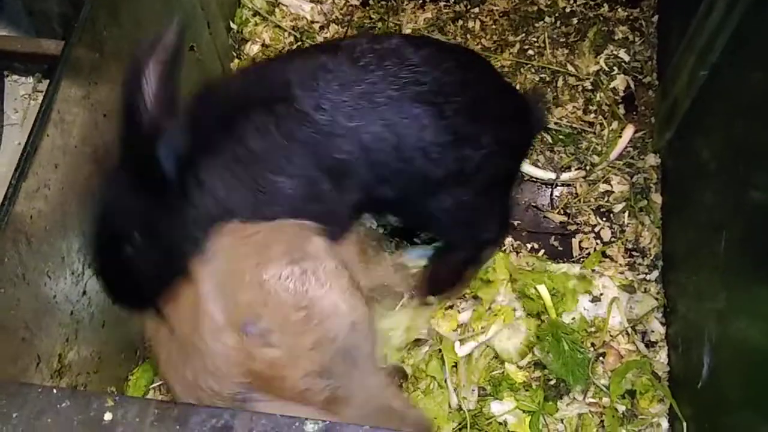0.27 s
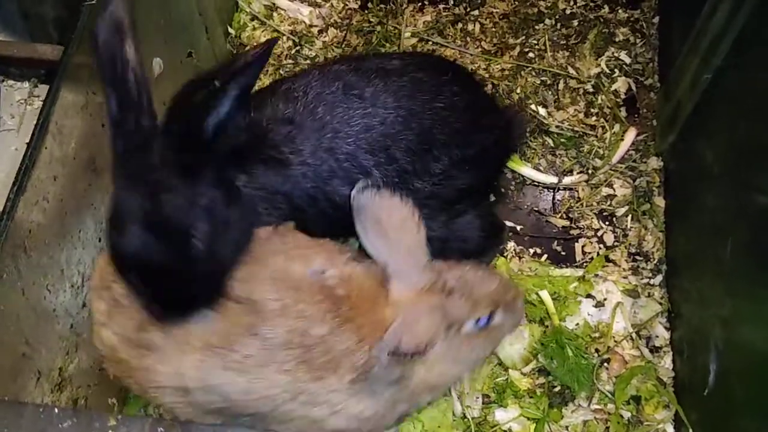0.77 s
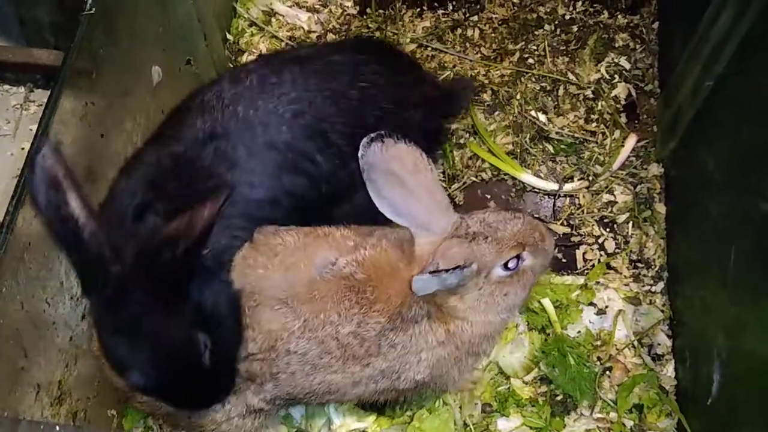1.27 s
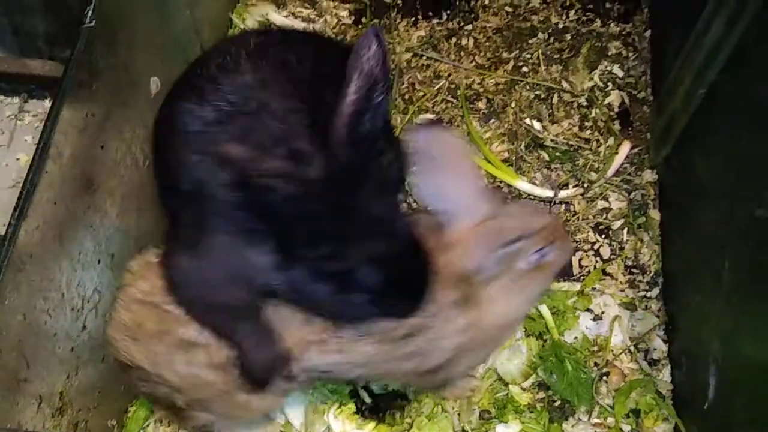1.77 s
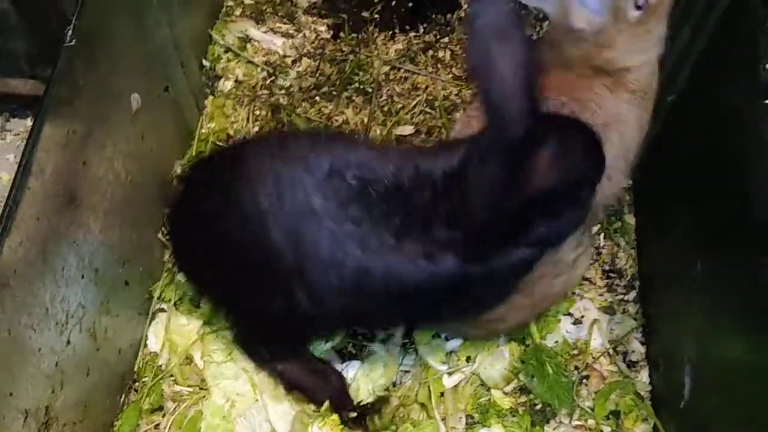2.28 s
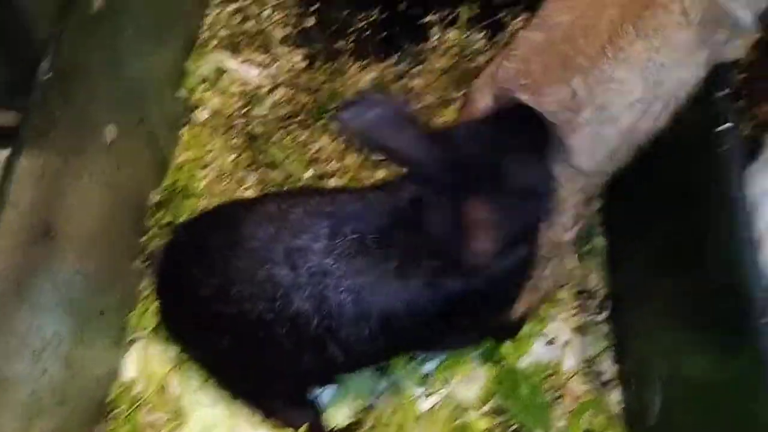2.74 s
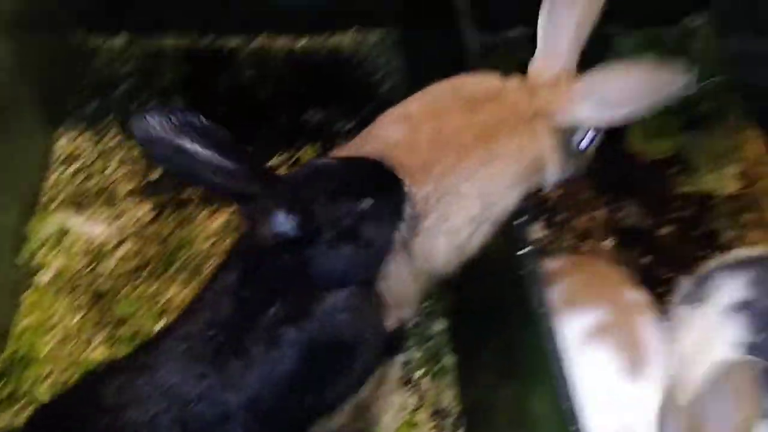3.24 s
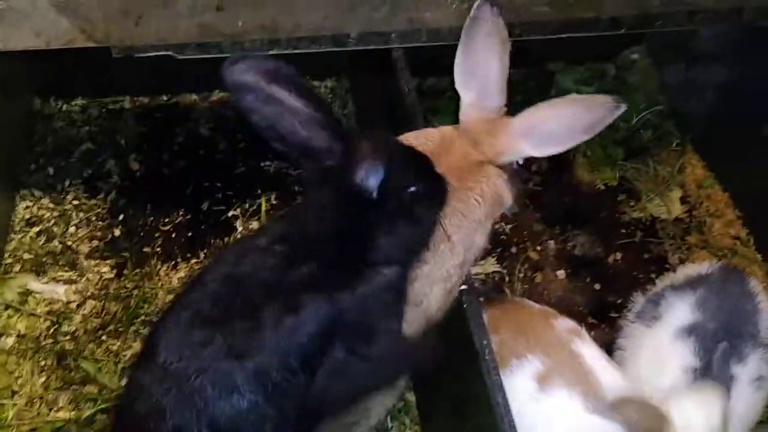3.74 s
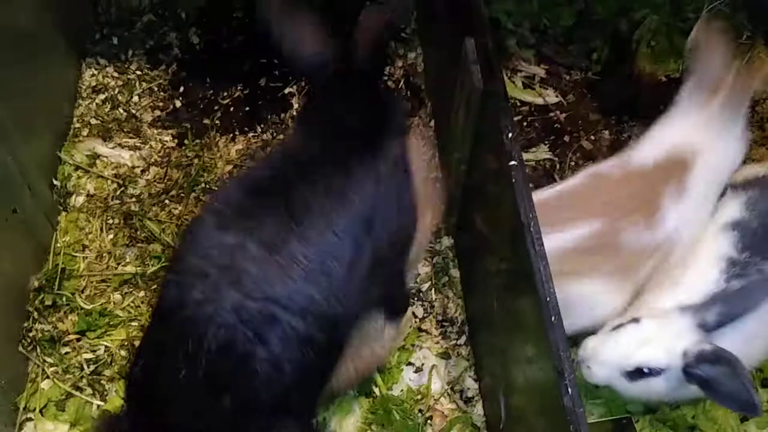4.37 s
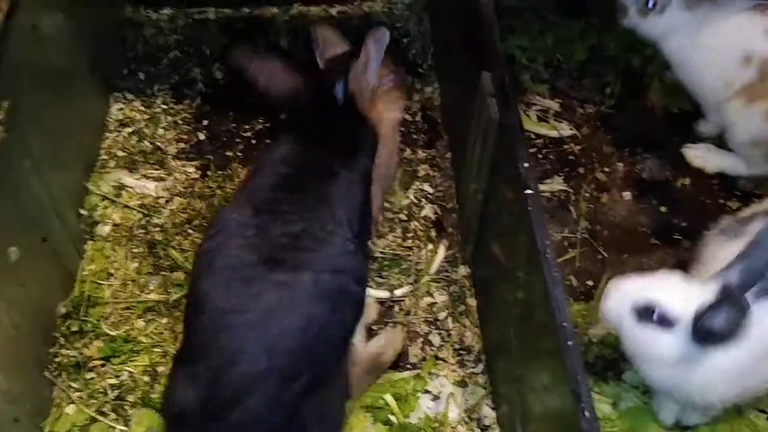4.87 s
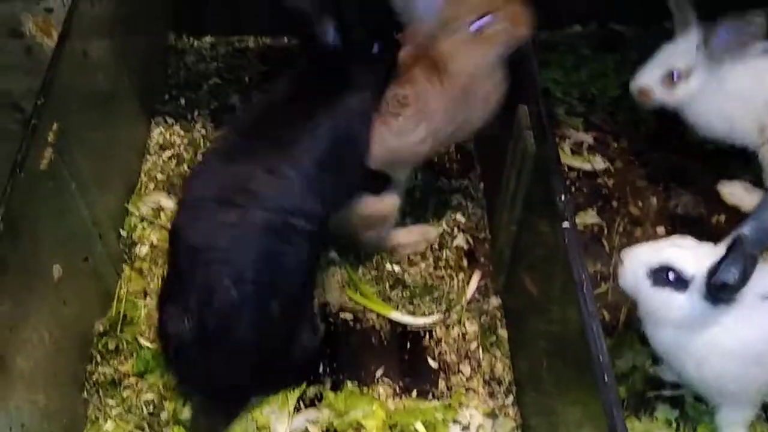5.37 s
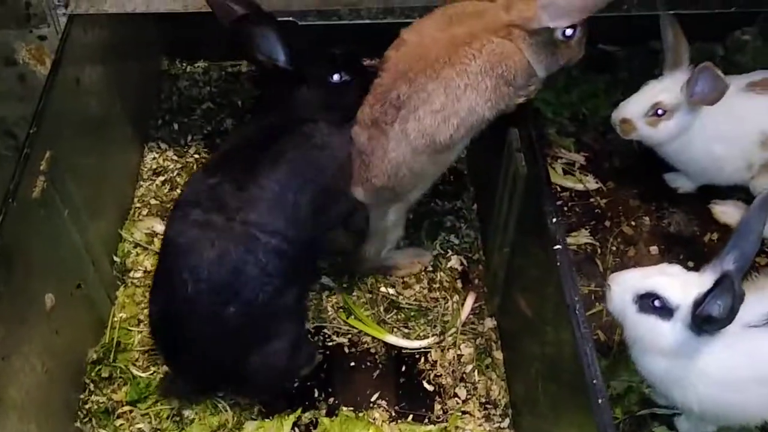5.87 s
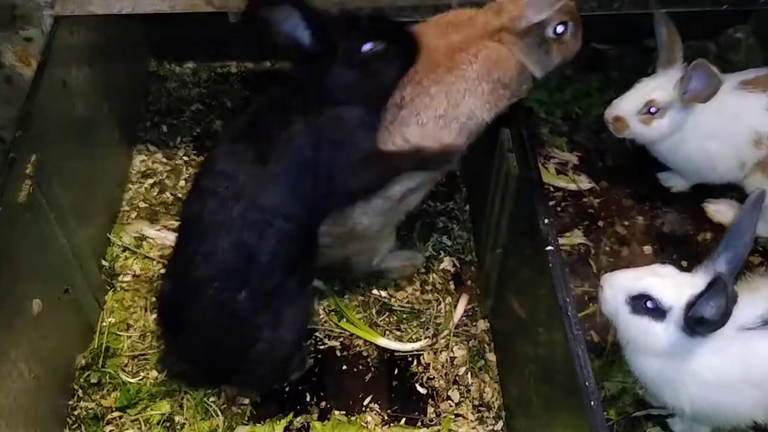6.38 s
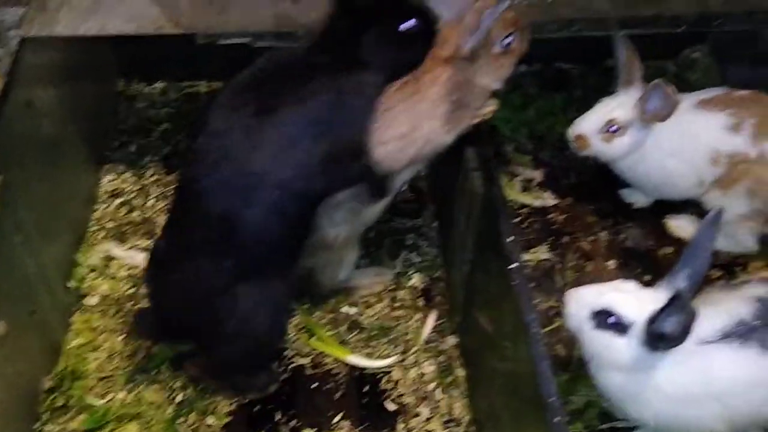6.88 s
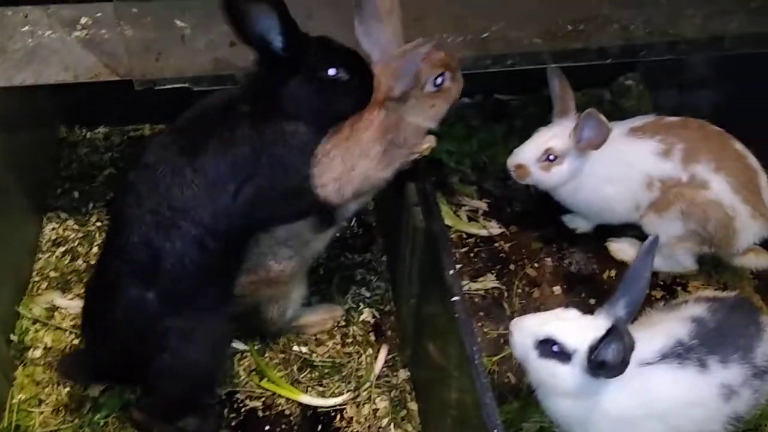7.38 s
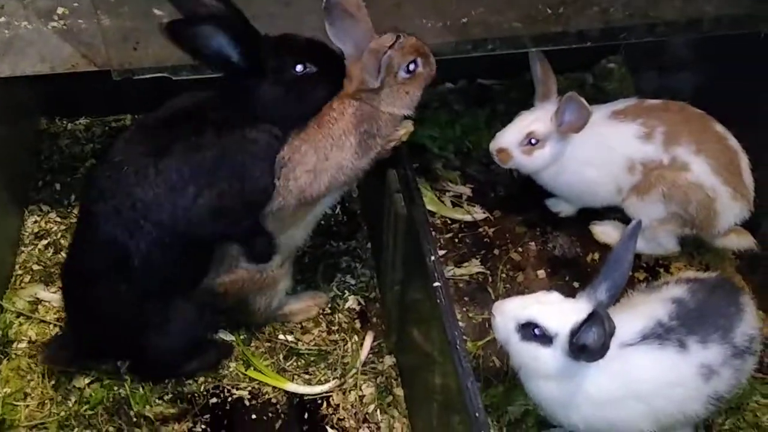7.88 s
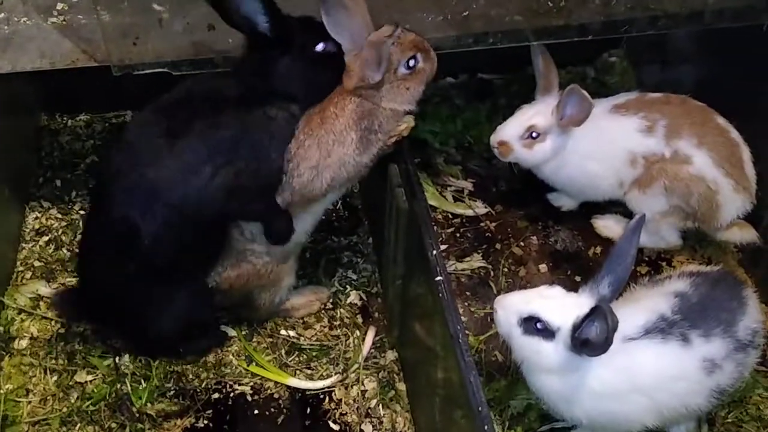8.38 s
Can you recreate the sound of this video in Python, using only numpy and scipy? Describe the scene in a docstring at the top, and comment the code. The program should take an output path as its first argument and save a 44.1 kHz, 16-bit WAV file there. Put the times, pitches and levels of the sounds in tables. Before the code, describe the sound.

Soft booming thumps, crisp bedding rustle and sudden claw scratches as two rabbits chase inside a wooden box, with a distant low rumble passing.

```python
"""Inside a wooden hutch, heard in stereo from just above: two rabbits chase and mount each other.
Feet boom on the hollow floor and knock the boards (ringing modes); claws rip the wood (noise bursts).
Shavings and leaves rustle and snap (grains and short cracks), with a brief echo from the walls.
Outdoors, filtered noise makes a hiss and a low rumble that swells once, like a far vehicle going by;
thin gliding calls, perhaps of a far bird, are faint."""
import sys
import numpy as np
from scipy import signal
from scipy.fft import rfft, irfft, next_fast_len
from scipy.io import wavfile

SR = 44100
rng = np.random.default_rng(int(sys.argv[2]) if len(sys.argv) > 2 else 0)


def file_out(sig):
    """Save sig as 16-bit WAV at sys.argv[1]."""
    # one column per channel
    cols = np.atleast_2d(sig).T
    # limit, then scale
    lim = np.clip(cols, -1, 1)
    pcm = np.round(lim * 32767).astype(np.int16)
    wavfile.write(sys.argv[1], SR, pcm)


N = 380141  # length [samples]
TIME = np.arange(N) / SR
RING_TIME = TIME[:SR // 2]  # each contact is given half a second


def from_db(db):
    """Turns a level in dB into an amplitude factor."""
    return 10 ** (np.asarray(db) / 20)


def rms_one(x):
    """Scales a signal to an rms of 1."""
    return x / np.sqrt(np.mean(x ** 2) + 1e-20)


def at_hz(points, hz):
    """Reads a spectrum on a log-frequency axis."""
    points = np.array(points)
    log_hz = np.log(np.maximum(hz, 1))
    return np.interp(log_hz, np.log(points[:, 0]), points[:, 1])


def panned(x, pan_db):
    """Shares a sound between the channels; positive is louder on the left."""
    return x * from_db([[pan_db / 2], [-pan_db / 2]])


def add(out, s, sound):
    """Mixes a sound in at time s."""
    start = max(0, round(s * SR))
    out[:, start:start + sound.shape[1]] += sound[:, :N - start]


def colour(x, spectrum):
    """Gives a signal a spectrum by weighting its frequencies; rms 1."""
    size = next_fast_len(x.shape[-1], True)
    gain = from_db(at_hz(spectrum, np.fft.rfftfreq(size, 1 / SR)))
    shaped = irfft(rfft(x, size) * gain, size)
    return rms_one(shaped[..., :x.shape[-1]])


def swell(rise_s, t60):
    """A ring that builds up and dies away, falling 60 dB in t60 seconds."""
    return (1 - np.exp(-RING_TIME / rise_s)) * from_db(-60 * RING_TIME / t60)


def plateau(s, hold_s, rise_db_per_s, fall_db_per_s):
    """Attack, hold and release in dB: full level (0 dB) from time s on, for hold_s."""
    rise_db = -rise_db_per_s * np.maximum(s - TIME, 0)
    fall_db = -fall_db_per_s * np.maximum(TIME - s - hold_s, 0)
    return rise_db + fall_db


def flutter(per_s, depth_db, size):
    """An uneven gain, gliding between random steps of at most twice the depth."""
    steps = rng.standard_normal(int(size / SR * per_s) + 2)
    steps = np.clip(steps, -2, 2)
    return from_db(depth_db * np.interp(TIME[:size] * per_s, np.arange(len(steps)), steps))


# likeness of the left and right microphone signals: (frequency [Hz], correlation [-1 to 1])
LIKENESS = [(100, 0.96), (400, 0.91), (700, 0.19), (1050, 0), (2000, 0.066), (15000, 0.0026)]


def noise(spectrum, size):
    """Diffuse stereo noise, much alike in both channels only in the bass."""
    padded = next_fast_len(size)
    alike = np.clip(at_hz(LIKENESS, np.fft.rfftfreq(padded, 1 / SR)), -1, 1)
    mid, side = rfft(rng.standard_normal((2, padded)))
    pair = np.sqrt(1 + alike) * mid + np.sqrt(1 - alike) * side * [[1], [-1]]
    return colour(irfft(pair, padded), spectrum)[:, :size]


def struck(modes, strength, rise_cycles):
    """One blow rings every mode with a random phase; high modes reach the channels out of step."""
    out = 0
    for hz, db, t60 in modes:
        apart = np.arccos(np.clip(at_hz(LIKENESS, hz), -1, 1)) * rng.choice([-.5, .5])
        phase = rng.uniform(0, 2 * np.pi) + apart * np.array([[1], [-1]])
        ring = swell(rise_cycles / hz, t60) * np.sin(2 * np.pi * hz * RING_TIME + phase)
        out = out + from_db(db + at_hz(strength, hz)) * ring
    return out


# hollow resonances of the wooden box: (frequency [Hz], width [Hz], added resonance [dB])
BOX = [(520.7, 55, 3), (604, 36, 4), (725, 110, 7), (943, 30, 5), (1006, 32, 6.5), (1236, 45, 3),
       (1530, 71, -1), (1957, 32, 1), (2250, 140, 3), (2480, 17, -3.5), (3640, 48, 6.5)]


def boxed(x):
    """The box lifts whatever lies near its hollow resonances."""
    out = x
    for hz, width_hz, db in BOX:
        out = out + from_db(db) * signal.lfilter(*signal.iirpeak(hz, hz / width_hz, fs=SR), x)
    return out


HUTCH_T60_S = .2


def hutch(x, echo_db):
    """Close wooden walls add a dense, short tail."""
    tail = rng.standard_normal((2, len(RING_TIME))) * swell(0.001, HUTCH_T60_S)
    tail = tail / np.sqrt(np.sum(tail ** 2, axis=1, keepdims=True))
    return x + from_db(echo_db) * signal.fftconvolve(x, tail, axes=1)[:, :N]


# spectra of the low rumble, the far road and the faint hiss: (frequency [Hz], relative density [dB])
RUMBLE = [(15, -12.5), (30, -5.5), (42, -0.5), (60, -3.5), (85, -6), (115, -1.5), (145, -5), (175, -9.5),
          (215, -10.5), (280, -27.5), (400, -36), (900, -58)]
ROAD = [(40, 7.5), (150, 16.5), (300, 12), (400, 2), (520, -1.5), (700, -12), (900, -17.5), (1200, -10.5),
        (1700, -13.5), (2600, -20), (5000, -33)]
HISS = [(200, 6), (1000, 4.5), (3000, 1), (7000, 0), (11000, 1.5), (15500, -7.5)]
HISS_DB = -84.5
# one slow swell, as of a far vehicle: it nears, stays a moment and recedes
PASS_S, PASS_HOLD_S = 4.82, .6
RUMBLE_REST_DB, RUMBLE_PASS_DB = -66.5, -52.5
ROAD_REST_DB, ROAD_PASS_DB = -90.5, -57.5


def outdoors():
    """A low rumble and far road noise swell and recede as noise; the box colours the road, a hiss stays."""
    rumble_db = RUMBLE_PASS_DB + plateau(PASS_S, PASS_HOLD_S, rise_db_per_s=14.5, fall_db_per_s=4.0)
    road_db = ROAD_PASS_DB + plateau(PASS_S, PASS_HOLD_S, rise_db_per_s=28, fall_db_per_s=10.5)
    # the steady and the passing part add as powers
    rumble_level = np.hypot(from_db(RUMBLE_REST_DB), from_db(rumble_db))
    road_level = np.hypot(from_db(ROAD_REST_DB), from_db(road_db))
    rumble = rumble_level * noise(RUMBLE, N) * flutter(per_s=19, depth_db=1.5, size=N)
    road = road_level * boxed(noise(ROAD, N)) * flutter(per_s=48, depth_db=3.0, size=N)
    return panned(rumble + road, 1.0) + from_db(HISS_DB) * noise(HISS, N)


# thin, faint gliding calls, perhaps of a far bird:
# (time [s], length [s], start pitch [Hz], end pitch [Hz], level [dB])
FAR_CALLS = [(0.106, 0.29, 1196, 1270, -81.5), (1.716, 0.35, 1116, 1280, -90),
             (3.486, 0.25, 1110, 1212, -89.5), (3.658, 0.1, 1434, 1600, -86),
             (6.236, 0.27, 1543, 1510, -81.5), (6.84, 0.055, 1234, 1245, -79.5),
             (6.89, 0.087, 1500, 1510, -86), (7.418, 0.065, 1504, 1590, -87)]


def far_bird():
    """Thin gliding calls, smeared by distance into a wavering band."""
    out = np.zeros((2, N))
    for s, length_s, start_hz, end_hz, db in FAR_CALLS:
        size = int(length_s * SR)
        phase = 2 * np.pi * np.cumsum(np.linspace(start_hz, end_hz, size)) / SR
        # slow noise in both quadratures spreads the pitch into a band
        waver = colour(rng.standard_normal((2, 2, size)), [(35, 0), (90, -7), (250, -28), (700, -80)])
        call = waver[0] * np.cos(phase) + waver[1] * np.sin(phase)
        add(out, s, from_db(db) * call * signal.windows.tukey(size, .5))
    return out


def grains(per_s, spread_db):
    """Countless tiny breaks of uneven size, each with its own strength in either channel."""
    born = rng.random(N) < per_s / SR
    sizes = from_db(spread_db * np.minimum(rng.exponential(1, N), 4))
    return born * sizes * rng.standard_normal((2, N))


def shifting(x, per_s, depth_db):
    """As strokes bend other stalks, the octaves of a rustle swell and fade on their own."""
    out, rest = 0, x
    for hz in 700 * 2 ** np.arange(5):
        below = signal.sosfiltfilt(signal.butter(2, hz, fs=SR, output="sos"), rest)
        out = out + below * flutter(per_s, depth_db, N)
        rest = rest - below
    return rms_one(out + rest * flutter(per_s, depth_db, N))


# a foot or flank sweeps through the bedding:
# (time [s], length [s], crisp shavings level [dB], dragging level [dB])
STROKES = [(0.035, 0.078, -70, -89), (0.256, 0.072, -64, -74.5), (0.33, 0.078, -54.5, -69.5),
           (0.421, 0.11, -57.5, -64), (0.57, 0.024, -66, -77), (0.773, 0.0081, -75.5, -99),
           (0.877, 0.0051, -81, -84.5), (1.295, 0.064, -81.5, -89.5), (1.432, .015, -75, -94),
           (1.535, 0.041, -67, -86), (1.727, 0.0084, -79, -102), (2.057, 0.034, -64.5, -74.5),
           (2.219, 0.2, -63, -74), (2.356, 0.079, -61.5, -71.5), (3.025, 0.015, -75, -76.5),
           (3.09, 0.089, -70, -84.5), (3.289, 0.005, -60, -68.5), (3.42, .02, -80.5, -103),
           (3.857, 0.053, -55, -68.5), (3.92, 0.01, -60, -59.5), (4.02, 0.06, -71.5, -82),
           (4.2, 0.023, -60, -68.5), (4.312, 0.0069, -54.5, -58.5), (4.394, 0.051, -59, -64),
           (4.535, 0.013, -62.5, -62.5), (4.863, 0.039, -60, -67), (5.047, 0.012, -55, -62),
           (5.129, 0.036, -53.5, -62), (5.207, 0.025, -59, -62.5), (5.297, 0.035, -62, -64.5),
           (5.423, 0.032, -61, -69.5), (5.52, 0.12, -68.5, -80), (5.789, 0.0053, -60.5, -69.5),
           (7.66, 0.012, -68, -83), (7.705, 0.0087, -69.5, -82.5), (8.414, 0.043, -66, -71),
           (8.575, 0.011, -77.5, -104)]
# every stroke bites quickly, then the shavings settle
BITE_DB_PER_S, SETTLE_DB_PER_S = 750, 173


def stroke_levels():
    """Gains of the crisp and the dragging rustle; the strongest stroke of the moment leads."""
    crisp = drag = -np.inf
    for s, length_s, crisp_db, drag_db in STROKES:
        shape_db = plateau(s, length_s, BITE_DB_PER_S, SETTLE_DB_PER_S)
        crisp = np.maximum(crisp, crisp_db + shape_db)
        drag = np.maximum(drag, drag_db + shape_db)
    return from_db(crisp), from_db(drag)


# spectra of crackling shavings and of dragging fur and feet: (frequency [Hz], relative density [dB])
CRISP = [(1500, -30), (3500, -10.5), (5500, -5.5), (8000, 3), (11000, 5), (13500, 3.5), (15500, -3.5)]
DRAG = [(200, -0.5), (450, -4), (750, -2.5), (1500, 3.5), (2400, 3), (4000, -3.5), (6500, -5.5),
        (12000, -22)]
STIR_DB = 14.5  # the floor's murmur under a dragging body, relative to the drag


def bedding():
    """Shavings crackle as grains under the bodies; fur and feet drag more dully and stir the floor."""
    crisp_level, drag_level = stroke_levels()
    catching = flutter(per_s=55, depth_db=2.4, size=N)  # a foot catches and slips
    fine = colour(catching * grains(per_s=3000, spread_db=3.3), CRISP)
    coarse = colour(catching * grains(per_s=600, spread_db=3.0), DRAG)
    crisp = crisp_level * shifting(fine, per_s=60, depth_db=3)
    drag = drag_level * boxed(shifting(coarse, per_s=45, depth_db=4))
    murmur = noise([(70, -12), (140, -1.5), (180, -8), (220, 1), (300, -17), (600, -32.5)], N)
    stir = from_db(STIR_DB) * drag_level * murmur
    return hutch(panned(crisp, 0.79) + panned(drag, -0.66), echo_db=-4.5) + stir


# single stalks snapping: (time [s], level before decay and echo [dB], left minus right [dB])
SNAPS = [(0.2573, -64, 12), (0.3095, -51, 0), (0.4968, -41.5, 4), (0.5346, -59, -9), (0.8777, -57, 8),
         (1.2392, -61, -11), (2.0735, -32.5, 5.5), (2.1365, -39, 5), (2.2958, -40.5, -3),
         (3.8794, -33, -0.5), (4.1999, -44, 3), (4.2217, -43.5, -3), (4.3195, -24.5, 2.5),
         (4.433, -43.5, -3), (4.538, -44, 5), (5.012, -48.5, 6), (5.208, -38, 3), (5.3352, -37, 1),
         (5.4211, -43, 2), (5.771, -52, 6), (6.9565, -23, 5.5)]
# spectrum of a crack before the stalk's own pitch: (frequency [Hz], relative density [dB])
SNAP_SPECTRUM = [(500, -21), (2000, -5), (4000, -0.5), (7000, 3), (11000, 1), (15500, 3)]


def snaps():
    """Dry stalks break with a crack of a few milliseconds, each with its own pitch."""
    out = np.zeros((2, N))
    for s, level_db, pan_db in SNAPS:
        crack = noise(SNAP_SPECTRUM, len(RING_TIME))
        stalk = signal.lfilter(*signal.iirpeak(rng.uniform(4000, 13000), 3, fs=SR), crack)
        snap = rms_one(crack + 2 * stalk) * swell(.00005, .01)
        add(out, s, from_db(level_db) * panned(snap, pan_db))
    return hutch(out, echo_db=-2.5)


# quick claw scratches:
# (time [s], panel ring level [dB], rasp level [dB], hiss level [dB], left minus right of the hiss [dB])
SCRATCHES = [(2.3624, -84, -52, -40.5, 3), (4.3185, -63, -52, -63, 10), (5.3282, -63, -58, -41, 4),
             (6.958, -56, -31.5, -28, 11), (7.6565, -93, -71, -64, 8), (8.407, -92.5, -62, -48, 7)]
# spectra of the scratch and of the panel's lingering ring: (frequency [Hz], relative density [dB])
SCRATCH_SPECTRUM = [(300, -13), (750, -27), (1150, -12.5), (1500, -5.5), (2100, 4), (3000, -1), (4500, -4),
                    (6500, -4), (10500, -1.5), (13000, -4), (15500, -13.5)]
PANEL = [(700, -42.5), (1000, -15.5), (1110, -1), (1200, -4), (1330, -23), (1780, -36.5), (1900, -3.5),
         (2020, -37), (4000, -65.5)]


def scratches():
    """A claw rips across the wood: a sudden, uneven rasp and hiss; the panel rings on a little."""
    out, size = np.zeros((2, N)), len(RING_TIME)
    rasp_filter = signal.butter(2, 5000, fs=SR, output="sos")
    hiss_filter = signal.butter(2, 5500, "high", fs=SR, output="sos")
    for s, panel_db, rasp_db, hiss_db, pan_db in SCRATCHES:
        grit = noise(SCRATCH_SPECTRUM, size)
        direct = grit * flutter(per_s=900, depth_db=3, size=size) * swell(.002, .155)
        echo = from_db(-15.0) * grit * swell(0.0061, 0.37)
        rasp = signal.sosfilt(rasp_filter, boxed(direct + echo))
        # only the direct hiss comes from one side; its echo fills the box
        hiss = signal.sosfilt(hiss_filter, panned(direct, pan_db) + echo)
        add(out, s, from_db(rasp_db) * rasp - from_db(hiss_db) * hiss)
        add(out, s, from_db(panel_db) * noise(PANEL, size) * swell(0.0031, 0.74))
    return out


# claws and bodies against the boards:
# (time [s], clatter level [dB], low modes level [dB], middle modes level [dB], high modes level [dB])
KNOCKS = [(0.403, -47, -29, -33.5, -53), (0.882, -79, -66, -96, -67.5), (1.576, -72, -64, -76, -75),
          (2.194, -80, -63, -72, -86), (2.887, -57, -62, -46, -32.5), (3.278, -54.5, -62, -54, -60.5),
          (4.314, -63, -36.5, -43, -43), (4.487, -58, -53, -48.5, -46), (5.234, -58, -73, -50, -55),
          (5.431, -72, -51, -54.5, -81), (7.719, -85, -62, -81, -75), (8.441, -85, -54, -66, -68)]
# ringing of the side boards: (frequency [Hz], relative level [dB], 60 dB decay time [s])
BOARD_MODES = [(237.4, -3, 0.35), (311, -2, 0.2), (348, -4, 0.2), (470, -3.5, 0.062), (550, -6.5, 0.2),
               (613, -2.5, 0.081), (695, -7, 0.15), (751, 2.5, .12), (972, -0.5, 0.068),
               (1083, -3.5, 0.084), (1338, -3, 0.11), (1422, -5.5, 0.089), (1720, -6.5, 0.11),
               (2060, -5.5, 0.19), (2400, -4, 0.062), (2780, -7.5, .15), (2830, -6, 0.062),
               (3200, -13.5, 0.11), (3558, -16, 0.21), (4260, -18.5, .14), (4720, -6, 0.076)]
CRACK_DB = -7  # a knock's crack, relative to its high modes


def knocks():
    """Hard contacts ring the side boards; their many weak modes blur into a short clatter."""
    rings, blur = np.zeros((2, 2, N))
    clatter_spectrum = [(200, -6.5), (500, -9.5), (750, 2.5), (1100, 9.0), (1700, -12.0), (4000, -34.5)]
    crack_spectrum = [(700, -18.5), (1500, -2.5), (3000, -4), (5000, -9), (8000, -9.0), (15000, -20)]
    for s, clatter_db, low_db, middle_db, high_db in KNOCKS:
        strength = [(500, low_db), (700, middle_db), (1100, middle_db), (2000, high_db)]
        add(rings, s, struck(BOARD_MODES, strength, rise_cycles=0.6))
        clatter = noise(clatter_spectrum, len(RING_TIME)) * swell(.003, .12)
        crack = noise(crack_spectrum, len(RING_TIME)) * swell(.002, .23)
        add(blur, s, from_db(clatter_db) * clatter)
        add(blur, s, from_db(high_db + CRACK_DB) * crack)
    return panned(rings + boxed(blur), -1)


# paws on the floor: (time [s], boom level [dB], pitch that the spot favours [Hz], dull thud level [dB])
THUMPS = [(.561, -43.5, 226, -47), (0.594, -41, 101, -57), (.808, -51.5, 170, -76), (.882, -44.5, 179, -66),
          (1.255, -57, 221, -80), (1.439, -44, 124, -78.5), (1.769, -52.5, 180, -65.5),
          (2.054, -34.5, 176, -50.5), (2.195, -41.5, 168, -48), (2.367, -27, 289, -30),
          (2.382, -29, 154, -42), (2.798, -46.5, 128, -65.5), (2.888, -33.5, 188, -35.5),
          (3.188, -46, 205, -69), (3.279, -40.5, 190, -58), (3.871, -29, 138, -48), (4.208, -35, 219, -72),
          (4.318, -23, 291, -59), (4.495, -31.5, 193, -41), (4.542, -33.5, 218, -51),
          (5.065, -22, 187, -30.5), (5.136, -41, 140, -59), (5.346, -26.5, 157, -35.5),
          (5.436, -24.5, 177, -34), (5.619, -43, 130, -44.5), (5.806, -40.5, 133, -45.5),
          (7.003, -25, 134.5, -30), (7.451, -47, 126, -64.5), (7.661, -31.5, 115, -57),
          (7.718, -30.5, 180.4, -49), (8.435, -33, 161, -69), (8.462, -34.5, 211, -45.5)]
# booming of the hollow floor: (frequency [Hz], relative level [dB], 60 dB decay time [s])
FLOOR_MODES = [(110, -3.5, 0.36), (140.53, 2, 0.41), (169.3, -6.5, 0.18), (211.4, 6.5, 0.19),
               (233.2, -5, 0.2), (331.5, -6.5, 0.26), (365.3, -9, 0.23), (487, -18, 0.25), (515, -3, 0.16),
               (595, -19, 0.089), (654, -19.5, 0.073), (782, -24, 0.12)]
# modes below and above the favoured pitch answer less
BELOW_DB_PER_OCTAVE, ABOVE_DB_PER_OCTAVE = 17, 24
SHOCK_DB = -10  # a hard landing shakes every mode, wherever it falls; relative to the thud


def thumps():
    """Soft paws set the floor's modes booming, over a dull thud of the bedding and the box."""
    boom, thuds = np.zeros((2, 2, N))
    modes_hz = np.array(FLOOR_MODES)[:, 0]
    thud_spectrum = [(30, -19.0), (70, -12.0), (120, 6.0), (230, -4.0),
                     (330, -17), (700, -38.5), (1100, -30.5), (2500, -53.0)]
    for s, boom_db, spot_hz, thud_db in THUMPS:
        octaves = np.log2(modes_hz / spot_hz)
        off_spot_db = np.minimum(BELOW_DB_PER_OCTAVE * octaves, -ABOVE_DB_PER_OCTAVE * octaves)
        mode_db = np.maximum(boom_db + off_spot_db, thud_db + SHOCK_DB)
        strength = np.transpose([modes_hz, mode_db])
        add(boom, s, struck(FLOOR_MODES, strength, rise_cycles=0.93))
        thud = noise(thud_spectrum, len(RING_TIME)) * swell(.003, 0.34)
        add(thuds, s, from_db(thud_db) * thud)
    return panned(boom + boxed(thuds), 1.7)


def scene():
    """Sums the layers, from the background outdoors to the paws on the floor."""
    return outdoors() + far_bird() + bedding() + snaps() + scratches() + knocks() + thumps()


CUTOFF_HZ = 15650


def record(dry):
    """The right microphone port is shaded in the upper treble; the top of both is cut steeply."""
    left, right = dry
    right = right - .6 * signal.lfilter(*signal.iirpeak(7300, 2.2, fs=SR), right)
    steep_cut = signal.ellip(10, .2, 80, CUTOFF_HZ, fs=SR, output="sos")
    return signal.sosfilt(steep_cut, [left, right])


dry = scene()
out = record(dry)
file_out(out)
```